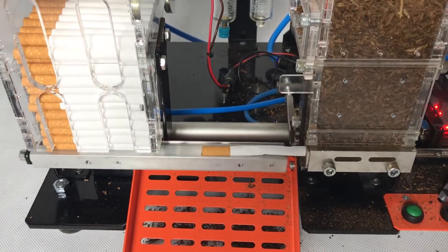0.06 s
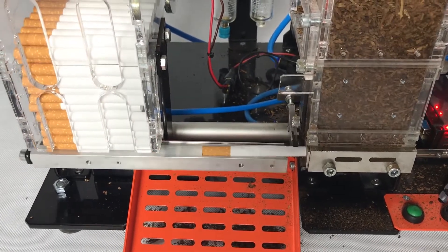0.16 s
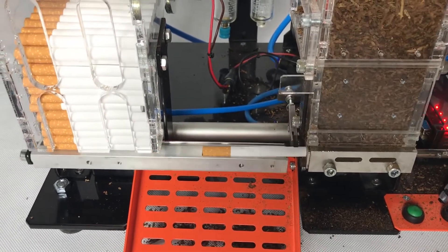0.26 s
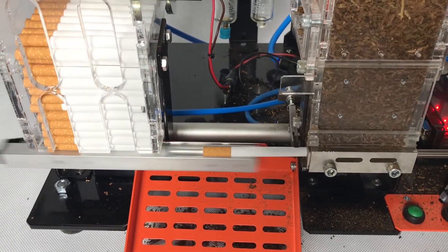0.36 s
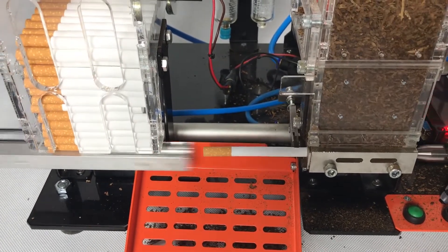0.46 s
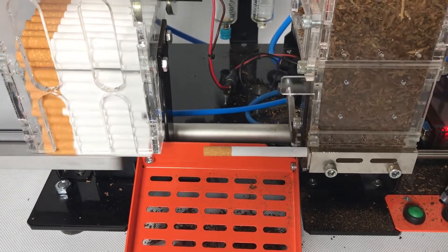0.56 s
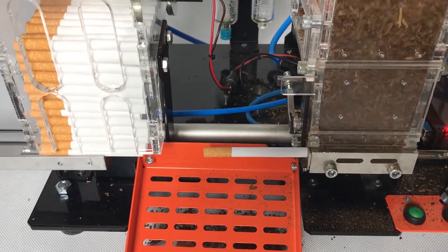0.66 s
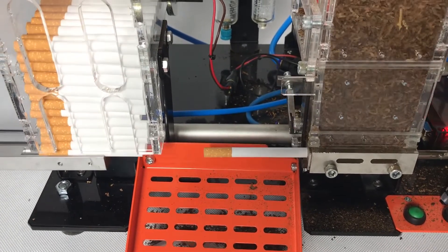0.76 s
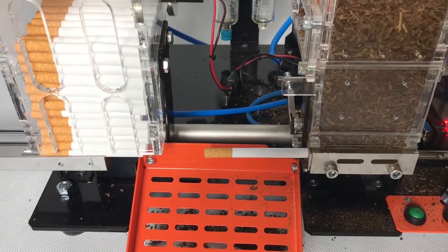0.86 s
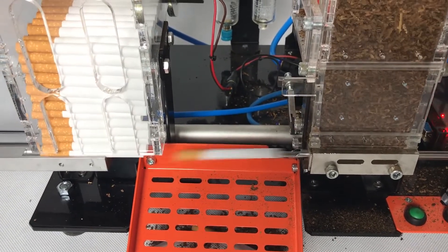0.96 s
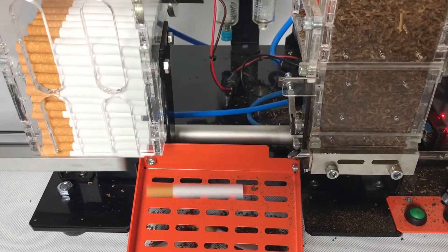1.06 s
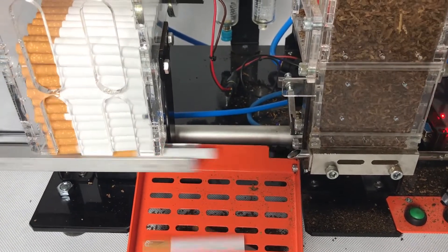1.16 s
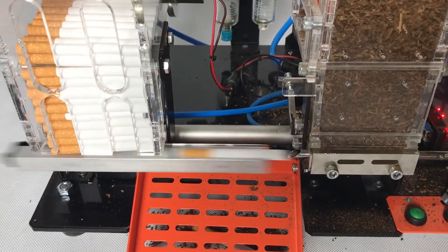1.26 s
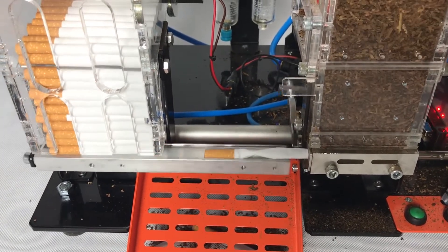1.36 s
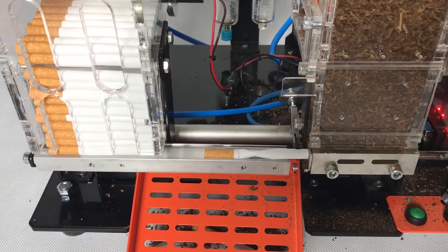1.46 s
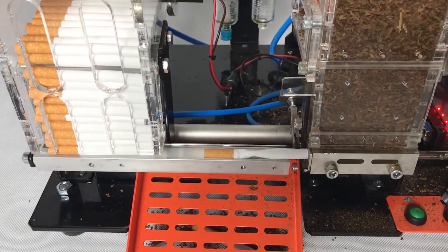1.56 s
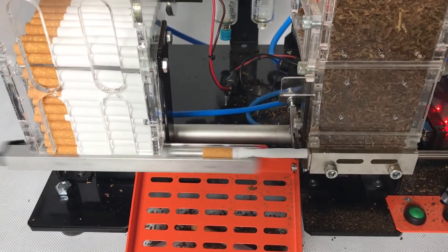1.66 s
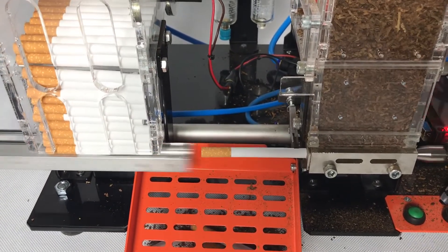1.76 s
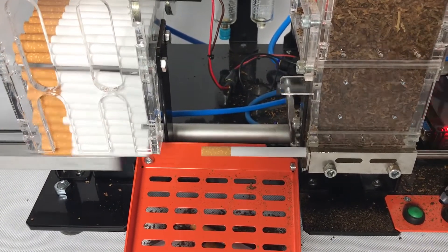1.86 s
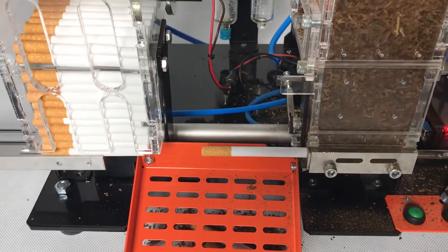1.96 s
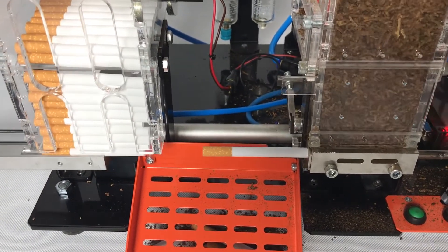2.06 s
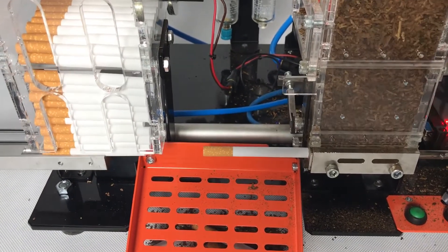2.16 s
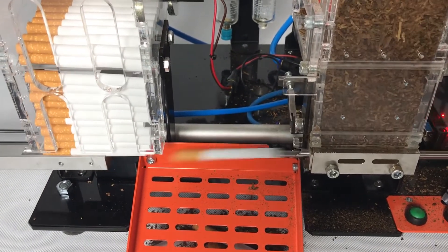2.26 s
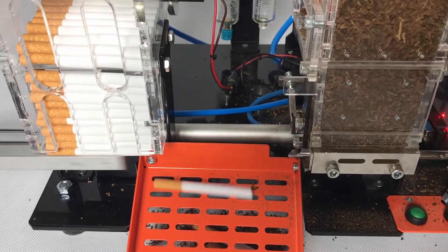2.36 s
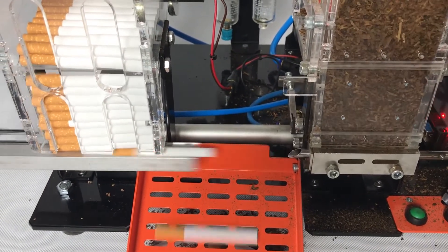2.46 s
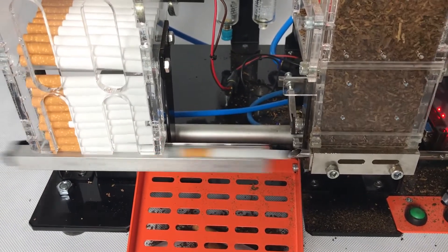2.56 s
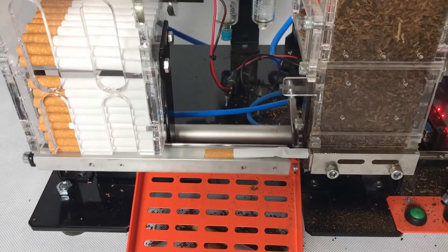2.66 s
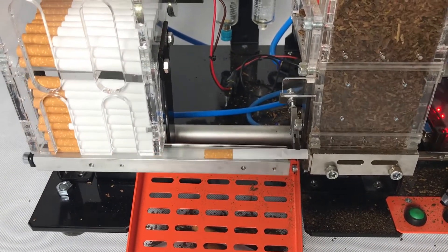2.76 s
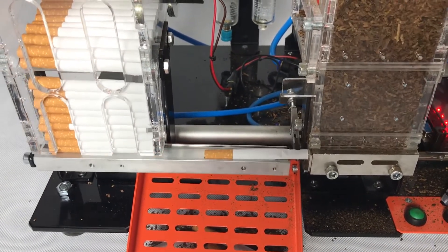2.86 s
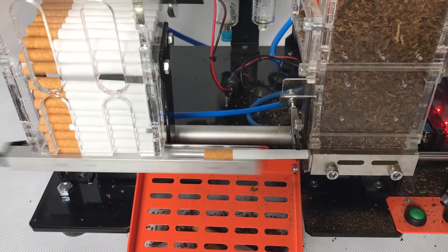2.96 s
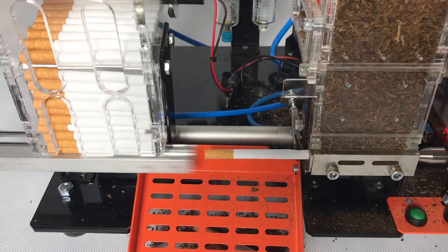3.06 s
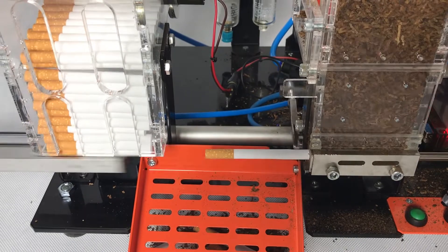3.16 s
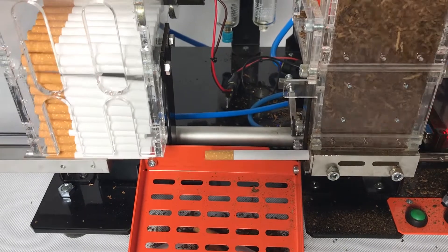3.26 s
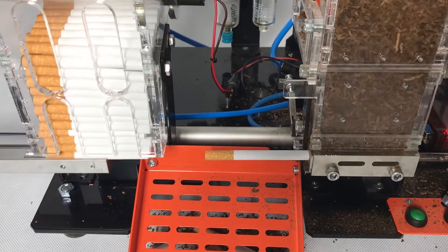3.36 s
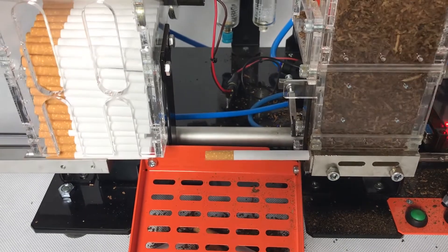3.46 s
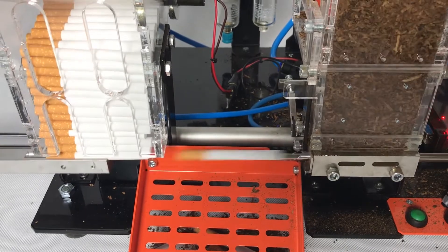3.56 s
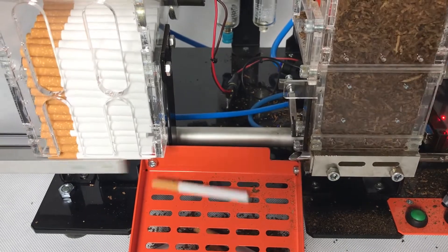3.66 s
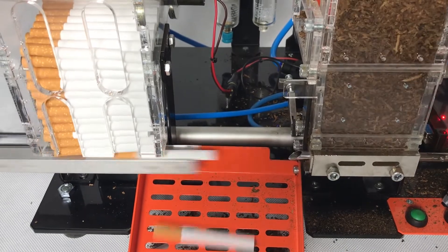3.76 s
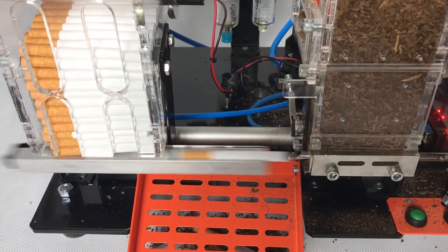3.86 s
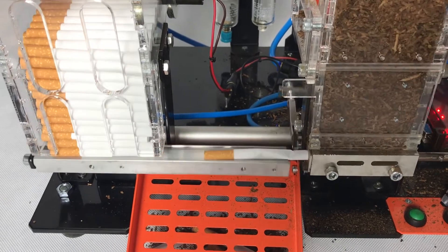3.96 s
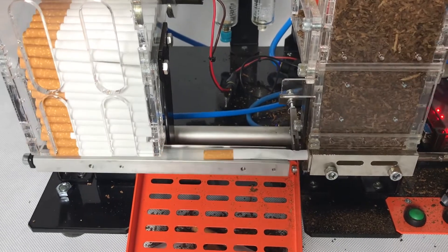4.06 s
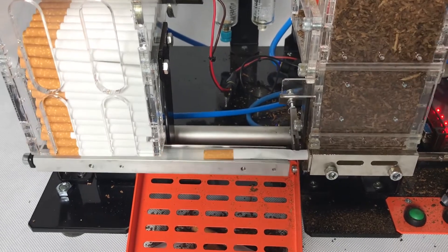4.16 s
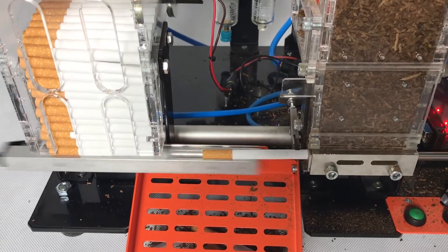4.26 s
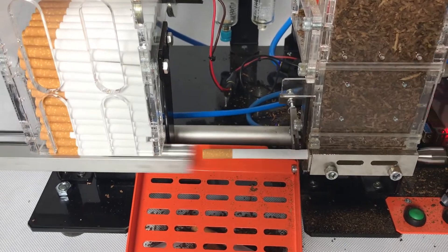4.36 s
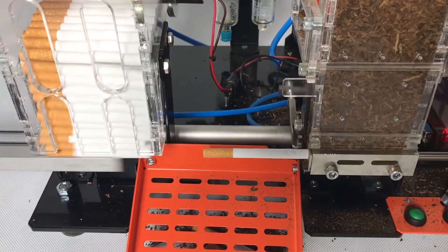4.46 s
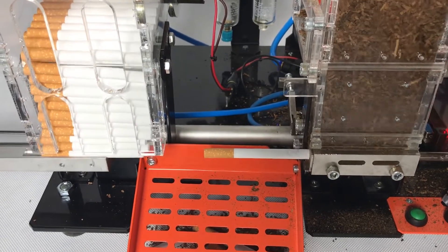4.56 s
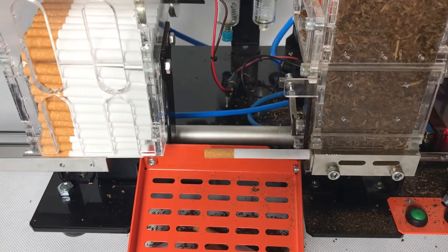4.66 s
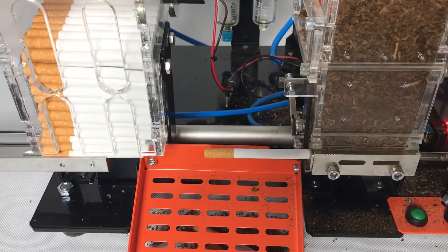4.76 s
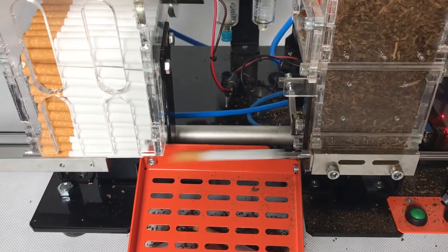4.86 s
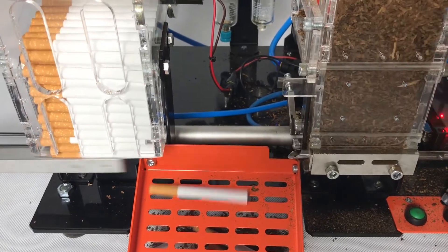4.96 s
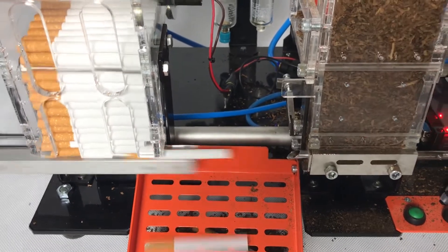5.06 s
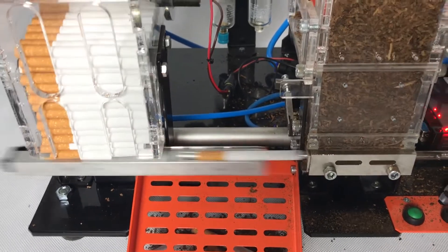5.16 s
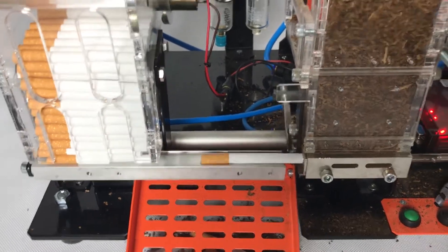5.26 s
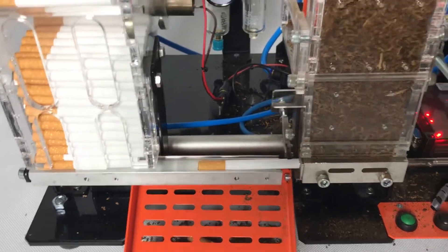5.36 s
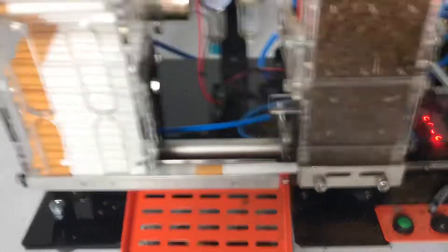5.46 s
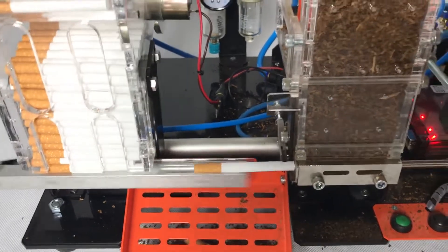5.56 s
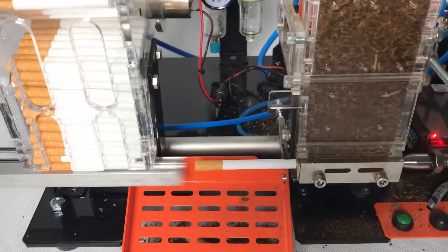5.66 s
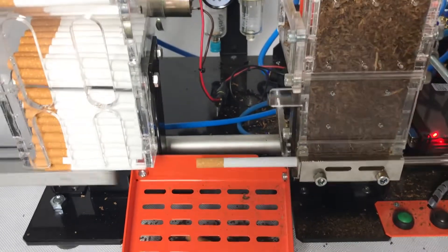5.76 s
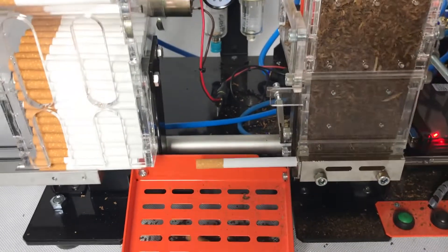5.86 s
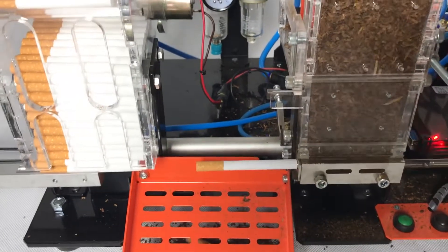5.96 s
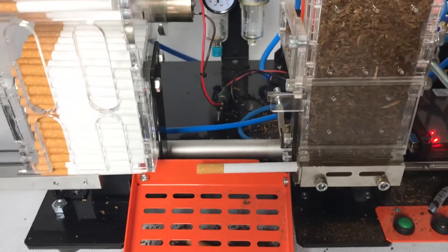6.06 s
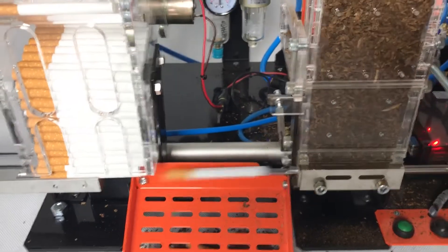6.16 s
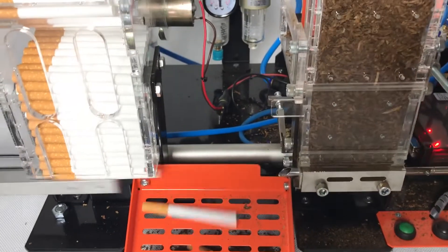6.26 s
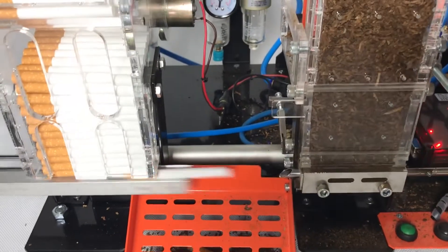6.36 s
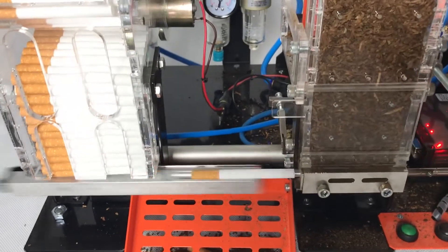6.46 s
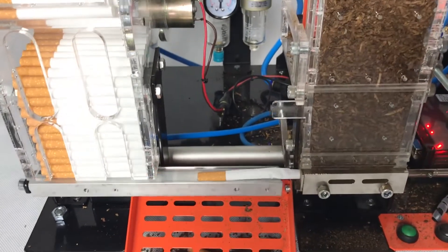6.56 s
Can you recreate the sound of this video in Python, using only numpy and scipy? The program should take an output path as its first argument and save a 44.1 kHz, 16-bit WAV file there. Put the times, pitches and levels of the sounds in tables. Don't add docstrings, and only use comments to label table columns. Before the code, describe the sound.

Rapid, even mechanical clacking with spitting compressed air, bench thumps and metallic rattles, repeating every 1.3 seconds over a faint fan whine.

```python
import sys
import numpy as np
from scipy import signal
from scipy.fft import rfft, irfft
from scipy.io import wavfile
from scipy.ndimage import uniform_filter1d

SR = 44100
rng = np.random.default_rng(int(sys.argv[2]) if len(sys.argv) > 2 else 0)


def unload_wav(signal):
    wavfile.write(
        sys.argv[1],
        SR,
        np.round(np.clip(np.atleast_2d(signal).T, -1, 1) * 32767).astype(np.int16),
    )


def rack_gain(trim_db):
    fader = np.asarray(trim_db, float)
    return 10 ** (fader / 20)


N = 291942
CYCLE_S = 1.30007
STARTS_S = CYCLE_S * np.arange(6)

# f/Hz, level/dB per Hz
ROOM_HUM = [(24, -49), (40, -12), (70, -8), (260, -9), (650, -5), (1300, -6), (2100, -15), (3000, -11.5),
            (4400, -17.5), (5600, -23), (9400, -27), (12000, -24), (16000, -40)]
# f/Hz, width/Hz, lift/dB
FAN_LINES = [(1610, 50, 7), (3820, 40, 11), (5300, 120, 5)]
ROOM_HUM_DB, WHINE_HZ, WHINE_DB = -38.5, 952, -41
WHISTLE_HZ, WHISTLE_DB = 3810, -50
CRUMBS_DB, CRUMBS_PER_S = -51, 70

# f/Hz, level/dB per Hz
SLIDE_AIR = [(410, -46), (700, -7.5), (1440, -6), (1750, -7.5), (1870, -33), (2000, -17), (2530, 0.5),
             (3990, -9.5), (5400, -2), (7490, -13), (12200, -16), (13300, -17), (14400, -17), (16000, -18)]
RAM_AIR = [(590, -19.5), (1000, -4.5), (1280, -11.5), (1540, -3), (1890, -9.5), (2740, 0.5), (3980, -14),
           (4900, -7.5), (5500, -2.5), (7880, -11.5), (9380, -5.5), (10400, -12), (12500, -8.5),
           (16000, -15.5)]
CUTTER_AIR = [(410, -42), (700, -5), (852, -13), (946, -16), (1040, -7.5), (1660, 0.5), (2220, -5),
              (2700, -10.5), (3890, -13.5), (4920, -13), (5610, -6.5), (10100, -20), (14600, -15),
              (16000, -27)]
EJECT_AIR = [(590, -27), (1000, -6), (1260, -17), (1570, -6), (1910, -7.5), (2680, 1), (3120, -2.5),
             (3460, -17.5), (5630, -3.5), (7700, -12), (9490, -6), (11400, -12.5), (12500, -6.5),
             (16000, -14)]
RETURN_AIR = [(260, -51), (450, -11), (507, -24), (572, -8.5), (1220, -17.5), (1650, 1), (2190, -8),
              (3490, -13), (3810, -27), (4490, -11.5), (5970, -11.5), (10200, -20.5), (13600, -19),
              (16000, -25)]
LEAK_AIR = [(240, -52), (400, -12), (893, -19), (935, -6), (1040, -5.5), (1820, -7.5), (2550, -2.5),
            (3640, -8.5), (5110, -3.5), (8500, -17.5), (9760, -15), (10400, -37), (13900, -17.5),
            (16000, -28)]
# f/Hz, width/Hz, lift/dB
JET_PEAKS = [(520, 90, 5), (1600, 200, 4), (2550, 150, 3), (2900, 250, 4), (3720, 170, 6), (4560, 200, 6),
             (5320, 180, 5), (5530, 170, 6), (5950, 220, 7), (6380, 220, 5), (7100, 260, 6), (7580, 170, 5),
             (8350, 200, 5), (8800, 170, 4), (9300, 220, 4), (9680, 260, 8), (10250, 170, 4), (11200, 220, 4),
             (12250, 280, 6), (12620, 220, 5), (13400, 280, 5), (13850, 170, 3), (14400, 200, 4),
             (15100, 350, 6)]
PEAK_DEPTH = 1.13
# opening t/s, closing t/s, flow level/dB, drift/dB per s, closing slope/dB per s
EXHAUSTS = [
    (0.083, 0.228, -23.5, -13, -78),
    (0.385, 0.548, -18, -32.5, -900),
    (0.568, 0.75, -25, 8.5, -550),
    (0.985, 1.074, -17.5, -29, -1100),
    (1.086, 1.16, -25.5, -31, -600),
    (1.101, 1.377, -35.5, 30, -5000),
]
BURST_DB, BURST_S = 5.5, 0.012
HASTEN_S = 0.05

PILOT_S = [
    0.0785,
    0.3782,
    0.7785,
    0.978,
]
PILOT_DB = [-23.5, -26, -28, -34]

# f/Hz, level/dB, t60/s
BENCH = [(57, -5.5, 0.031), (79.5, -16, 0.082), (117.6, -1.5, 0.05), (173.2, -2, 0.023), (269, 0.5, 0.018)]
CASE = [(452, -37, 0.013), (558, 1.5, 0.036), (667, 0.5, 0.04), (950, 5.5, 0.014), (1200, -13, 0.013),
        (1600, 5, 0.026), (2044, -9.5, 0.031)]
# f/Hz, level/dB
SNAP = [(300, -9.5), (1000, 6), (2000, 1.5), (3200, 0.5), (4500, -7.5), (5800, -5), (7500, -7.5),
        (10000, -11.5), (13000, -9.5), (16000, -14)]
# t/s, knock f/Hz, strength level/dB, metal clatter level/dB
VALVES = [
    (0.0842, 1540, -8.5, -3),
    (0.3836, 1600, -7, -12.5),
    (0.7851, 1270, -13, -5.5),
    (0.9839, 1600, -9.5, -27),
]
STOPS = [
    (0.395, 1050, -2, -13),
    (0.5643, 1510, 1, -4.5),
    (0.6969, 1030, -2, -7.5),
    (0.8967, 1020, -1, -8.5),
    (1.0667, 950, -4, -13),
]
REBOUNDS = [
    (0.585, 1280, -10.5, -15),
    (0.7075, 930, -14.5, -6),
    (1.0845, 1830, -8.5, -6),
]
SHOVES = [
    (0.8, 1002, -26, -14),
    (0.9068, 1500, -19, -3),
]
TAPS = [
    (0.69, 1017, -13.5, -16),
    (0.729, 998.6, -6.5, -5.5),
]
SHAKES = [
    (0.1045, 980, -13.5, -28),
    (0.1108, 1000, -15.5, -24),
    (0.252, 810, -23, -24),
]
# knock level/dB, bench thump level/dB, case rattle level/dB
VALVE_MIX, STOP_MIX, REBOUND_MIX = (-13, 0.1, -3.5), (0.1, -9.5, -16), (0.1, -2.2, -5)
SHOVE_MIX, TAP_MIX, SHAKE_MIX = (-15, 0.1, -2), (0.1, -22, -6), (-30, -14, 0.093)
# t/s, f/Hz, level/dB
RINGS = [(0.0842, 2686, -9.5), (0.106, 575, -19.5), (0.105, 1340, -22.5), (0.384, 2870, -9.5),
         (0.395, 1510, -18), (0.564, 1430, -21), (0.565, 1870, -16), (0.585, 2650, -11.5),
         (0.7071, 950, -12), (0.73, 1110, -8), (0.898, 1660, -16), (0.9072, 950, -12.5),
         (0.9072, 3680, -21.5), (0.984, 2920, -22), (1.067, 1030, -22), (1.084, 2580, -12.5)]
VALVE_RING_HZ, VALVE_RING_DB, RING_T60_S = 1600, -14, 0.029
# t/s, level/dB
NUDGES = [
    (0.2, -44),
    (0.258, -31),
    (0.548, -25),
    (1.2, -44),
    (1.234, -45),
    (1.269, -45),
]
# t/s, peak level/dB
SETTLES = [(0.272, -14), (0.3364, -16), (0.3405, -9), (0.368, -9), (1.5452, -4), (1.597, -10),
           (1.6204, -12), (1.6639, -9), (2.845, -10), (2.9134, -11), (2.943, -7), (4.1717, -7),
           (4.198, -13), (4.2374, -17), (4.2415, -11), (4.268, -10), (5.38, -10), (5.495, -16),
           (5.518, -12), (5.563, -13)]
# t/s, level/dB, brightness/0-1
TICKS = [
    (0.555, -28, 0.25),
    (0.828, -29, .8),
    (0.856, -25, .95),
    (0.887, -20, 0.96),
    (0.947, -22.5, 0.77),
    (0.967, -26, .9),
]
# t/s, knock f/Hz, strength level/dB, metal clatter level/dB
STRAYS = [
    (1.551, 680, -17, -42),
    (6.607, 1200, -12, -27),
]
# t/s, low f/Hz, high f/Hz, share level/dB
SPREADS = [(1.776, 11600, 13300, -3), (2.519, 9600, 11200, -3), (3.61, 4600, 6350, -3),
           (3.61, 6800, 8300, -3), (3.61, 8900, 10350, -3), (3.868, 4000, 5400, -3),
           (3.868, 10800, 12600, -3), (4.123, 9500, 11200, -3)]


def evened(x):
    return x / np.sqrt(np.mean(x ** 2) + 1e-20)


def add(mix, s, sound):
    if s >= 0:
        part = mix[round(s * SR):][:len(sound)]
        part += sound[:len(part)]


def hiss(colour, resonances, patchy_db, size=512):
    frames, hz = 4 * N // size + 5, np.fft.rfftfreq(size, 1 / SR)
    a, b, patches = rng.standard_normal((frames, len(hz), 3)).T
    patches = uniform_filter1d(patches, size=6, axis=0)
    patches = evened(uniform_filter1d(patches, size=6, axis=1))
    f, level = np.transpose(colour)
    db = np.interp(np.log(hz + 1), np.log(f), level)
    for centre, width, lift in resonances:
        db = db + lift * np.exp(-(2 * (hz - centre) / width) ** 2 / 2)
    z = (a + 1j * b) * rack_gain(db[:, None] + patchy_db * patches)
    return evened(signal.istft(z, nperseg=size, noverlap=3 * size // 4)[1][:N])


def room_tone():
    drift, sway = (evened(uniform_filter1d(rng.standard_normal(N), size=3000)) for _ in range(2))
    whine_hz = WHINE_HZ + 3.64 * drift
    whistle_hz = WHISTLE_HZ + 9 * drift
    whine = np.sin(2 * np.pi * np.cumsum(whine_hz) / SR) * rack_gain(WHINE_DB + 2.5 * sway)
    whistle = np.sin(2 * np.pi * np.cumsum(whistle_hz) / SR) * rack_gain(WHISTLE_DB + 2.5 * sway[::-1])
    return whine + whistle + rack_gain(ROOM_HUM_DB) * hiss(ROOM_HUM, FAN_LINES, patchy_db=1.5, size=2048)


def chatter(grain, fade_s):
    t = np.arange(len(grain)) / SR
    shower = grain * abs(grain) * np.exp(-t / fade_s) * np.minimum(t / 0.00033, 1)
    return shower / np.linalg.norm(shower)


def snap(drive):
    f, db = np.transpose(SNAP)
    hz = np.fft.rfftfreq(len(drive), 1 / SR)
    gain = rack_gain(np.interp(np.log(hz + 1), np.log(f), db))
    return 9.07 * irfft(rfft(drive) * gain, len(drive))


def crumbs():
    size = rack_gain(19.0 * np.minimum(rng.exponential(1, N), 4))
    size = size * (rng.random(N) < CRUMBS_PER_S / SR)
    tick = snap(chatter(rng.standard_normal(600), fade_s=0.0012))
    return rack_gain(CRUMBS_DB) * evened(signal.oaconvolve(size, tick)[:N])


def air():
    out, t = np.zeros(N), np.arange(N) / SR
    colours = [SLIDE_AIR, RAM_AIR, CUTTER_AIR, EJECT_AIR, RETURN_AIR, LEAK_AIR]
    peaks = np.multiply(JET_PEAKS, [1, 1, PEAK_DEPTH])
    for (opens, closes, flow_db, drift, closing), colour in zip(EXHAUSTS, colours):
        age = (t - opens) % CYCLE_S
        open_s = closes - opens
        db = flow_db + BURST_DB * np.exp(-age / BURST_S) + drift * np.minimum(age, open_s)
        late = np.maximum(age - open_s, 0)
        db += closing * late * (1 + late / HASTEN_S)
        out += uniform_filter1d(rack_gain(db), size=80) * hiss(colour, peaks, patchy_db=2.33)
    return out


def walls(x):
    t = np.arange(14000) / SR
    a, b = rng.standard_normal((2, 14000))
    dull = uniform_filter1d(a, size=12) * rack_gain(3.0 - 60 * t / 0.23)
    bright = b * rack_gain(-60 * t / 0.37)
    tail = (dull + bright) * np.clip((t - 0.004) / 0.001, 0, 1)
    return signal.fftconvolve(x, tail / np.linalg.norm(tail))[:N]


def pilot_spits():
    out, t = np.zeros(N), np.arange(400) / SR
    for start in STARTS_S:
        for s, db in zip(PILOT_S, PILOT_DB):
            spit = np.diff(snap(rng.standard_normal(401))) * np.exp(-t / 0.011)
            add(out, start + s, rack_gain(db) * evened(spit))
    return out


def ring(modes, drive):
    t = np.arange(len(drive)) / SR
    body = sum(rack_gain(db - 60 * t / t60) * np.sin(2 * np.pi * hz * t) for hz, db, t60 in modes)
    return signal.fftconvolve(drive, body)[:len(t)]


def thump(t):
    bent = t + 0.0011 * (1 - np.exp(-t / 0.0005))
    swing = -sum(rack_gain(db - 60 * t / t60) * np.sin(2 * np.pi * hz * bent) for hz, db, t60 in BENCH)
    return swing * np.minimum(t / 0.00067, 1)


def blow(knock_hz, knock_db, thump_db, rattle_db, clatter_db, habit):
    t = np.arange(6000) / SR
    turns = knock_hz * t
    knock = -np.sin(2 * np.pi * turns) * 4.75 * turns ** 2 * np.exp(-1.5 * turns ** 1.6)
    grain = 0.72 * habit + 0.67 * rng.standard_normal(habit.shape)
    rattle = 0.12 * evened(ring(CASE, chatter(grain[0], fade_s=0.0051)))
    contacts = chatter(grain[1], fade_s=0.0062) + 0.21 * chatter(grain[1, ::-1], fade_s=0.043)
    clatter = snap(contacts)
    push = thump(np.maximum(t - 0.0011, 0))
    return rack_gain(knock_db) * knock + rack_gain(thump_db) * push + rack_gain(rattle_db) * rattle + rack_gain(clatter_db) * clatter


def mixed(rows, mix):
    return [(s, hz, *(db + np.array(mix)), clatter_db) for s, hz, db, clatter_db in rows]


def machine_blows():
    out = np.zeros(N)
    blows = sorted(mixed(VALVES, VALVE_MIX) + mixed(STOPS, STOP_MIX) + mixed(REBOUNDS, REBOUND_MIX)
                   + mixed(SHOVES, SHOVE_MIX) + mixed(TAPS, TAP_MIX) + mixed(SHAKES, SHAKE_MIX))
    habits = rng.standard_normal((len(blows), 2, 6000))
    for start in STARTS_S:
        for (s, knock_hz, *levels), habit in zip(blows, habits):
            slack = rack_gain(0.5 * rng.standard_normal())
            add(out, start + s, slack * blow(knock_hz, *levels, habit))
    return out


def note(hz, db, t60):
    t = np.arange(3000) / SR
    second_hz = hz * rng.normal(1, 0.07)
    pair = np.sin(2 * np.pi * hz * t) + 0.7 * np.sin(2 * np.pi * second_hz * t)
    return rack_gain(db - 60 * t / min(t60, 0.035)) * pair * np.minimum(t / 0.0012, 1)


def struck_notes():
    out = np.zeros(N)
    rings = RINGS + [(s, VALVE_RING_HZ, VALVE_RING_DB) for s, *_ in VALVES]
    for start in STARTS_S:
        for s, hz, db in rings:
            add(out, start + s, note(hz * rng.normal(1, 0.012), db + rng.standard_normal(), RING_T60_S))
    return out


def carriage_nudges():
    out, t = np.zeros(N), np.arange(6000) / SR
    for start in STARTS_S:
        for s, db in NUDGES:
            add(out, start + s, rack_gain(db + 0.51 * rng.standard_normal()) * thump(t))
    return out


def tube_settling():
    out = np.zeros(N)
    for s, db in SETTLES:
        add(out, s, rack_gain(db - 9.5) * snap(chatter(rng.standard_normal(2000), fade_s=0.002)))
    return out


def armature_ticks():
    out = np.zeros(N)
    for start in STARTS_S:
        for s, db, bright in TICKS:
            contact = chatter(rng.standard_normal(2000), fade_s=0.0015)
            tick = bright * snap(contact) + (1 - bright) * ring(CASE, contact)
            add(out, start + s, rack_gain(db + 1.9 * rng.standard_normal()) * tick)
    return out


def stray_knocks():
    out = np.zeros(N)
    for s, *rest in mixed(STRAYS, SHAKE_MIX):
        add(out, s, blow(*rest, rng.standard_normal((2, 6000))))
    return out


def scene():
    blows = crumbs() + pilot_spits() + machine_blows() + struck_notes()
    blows += carriage_nudges() + tube_settling() + armature_ticks() + stray_knocks()
    jets = air()
    tail = walls(rack_gain(-15.5) * blows + rack_gain(-13) * jets)
    return np.tile(blows + jets + tail + room_tone(), (2, 1))


def sideways(mono):
    side, hz = np.zeros(N), np.fft.rfftfreq(2048, 1 / SR)
    for s, low_hz, high_hz, db in SPREADS:
        start = s - 0.023
        piece = mono[round(start * SR):][:2048] * np.sin(np.pi * np.arange(2048) / 2048)
        shifted = np.roll(rfft(piece), shift=3)
        add(side, start, rack_gain(db) * irfft(shifted * (hz > low_hz) * (hz < high_hz)))
    return side


def roll_off(x):
    return signal.sosfilt(signal.butter(12, 16670, fs=SR, output="sos"), x)


def record(dry):
    cut = signal.sosfilt(signal.butter(4, 52, "highpass", fs=SR, output="sos"), dry)
    lowpass = signal.firwin(1023, 15760, window=("kaiser", 9), fs=SR)
    cut = signal.oaconvolve(cut, lowpass[None], "same")
    limited = cut / (1 + abs(cut / 0.99) ** 5) ** (1 / 5)
    mix = limited + [[1], [-1]] * sideways(limited[0])
    return roll_off(mix)


dry = scene()
out = record(dry)
unload_wav(out)
```